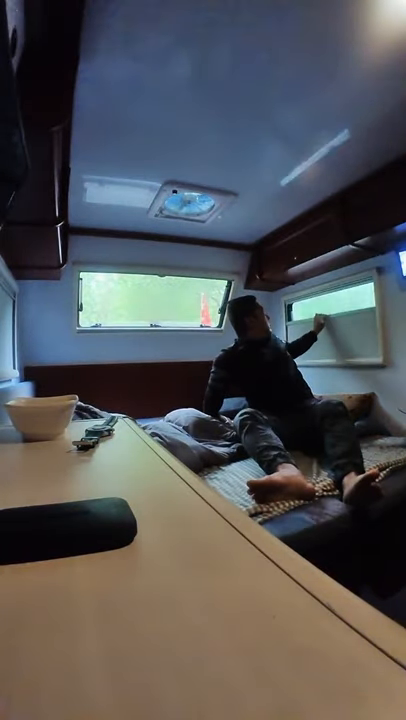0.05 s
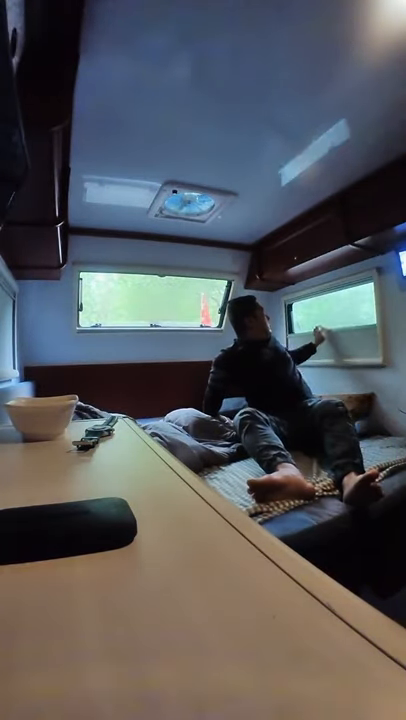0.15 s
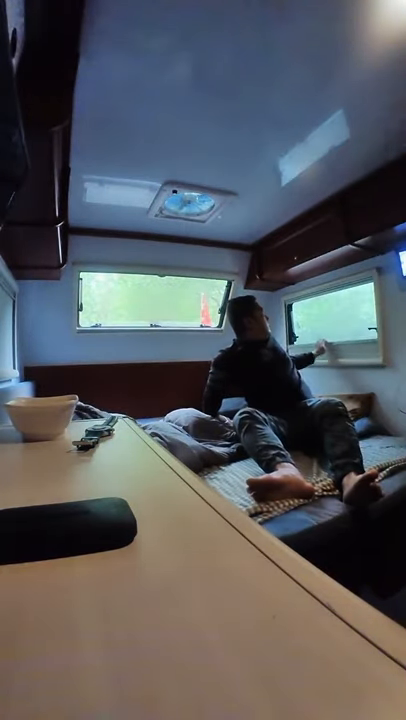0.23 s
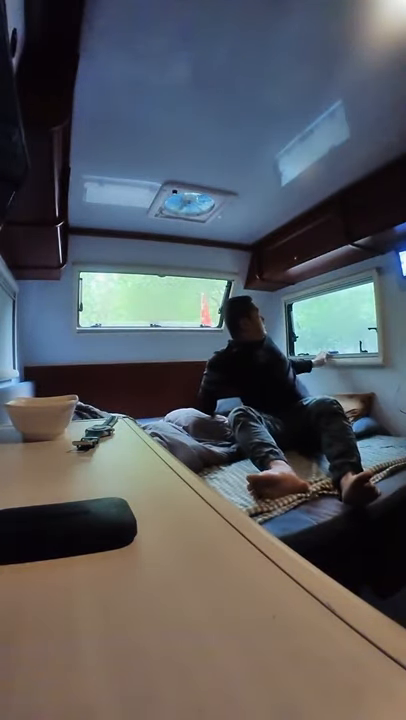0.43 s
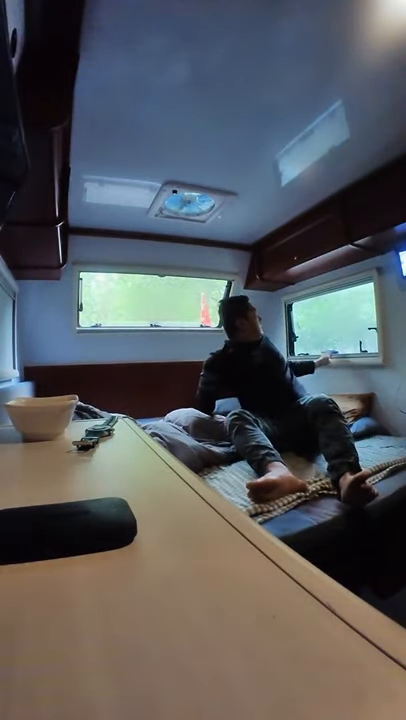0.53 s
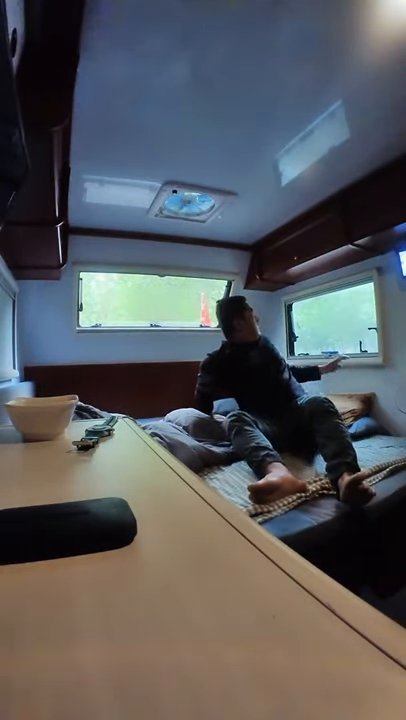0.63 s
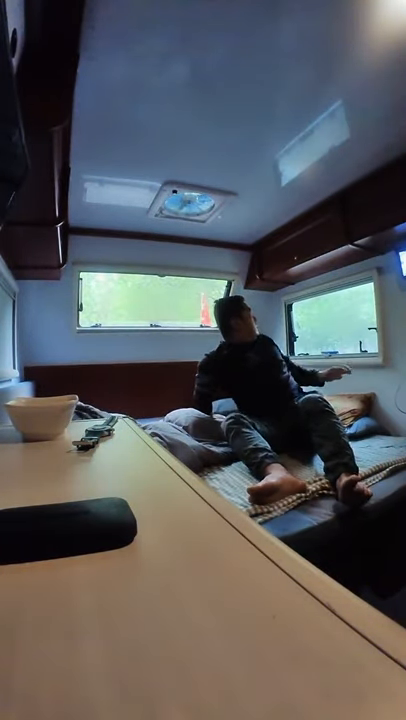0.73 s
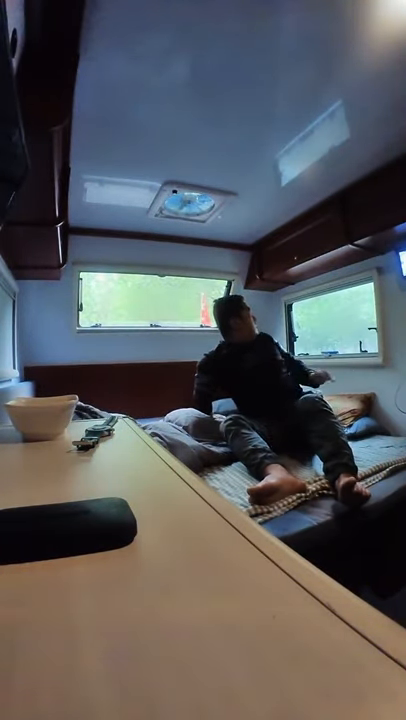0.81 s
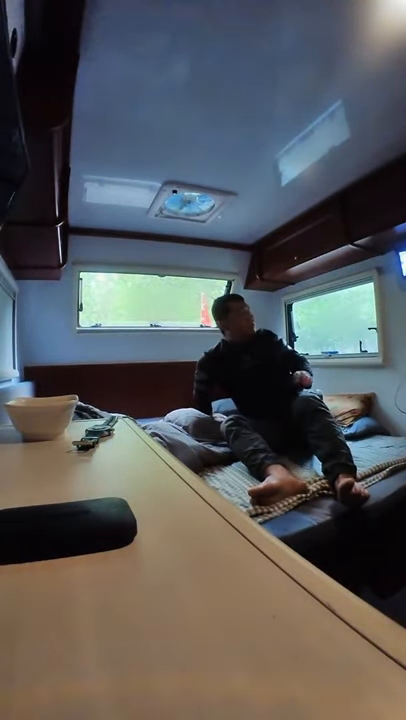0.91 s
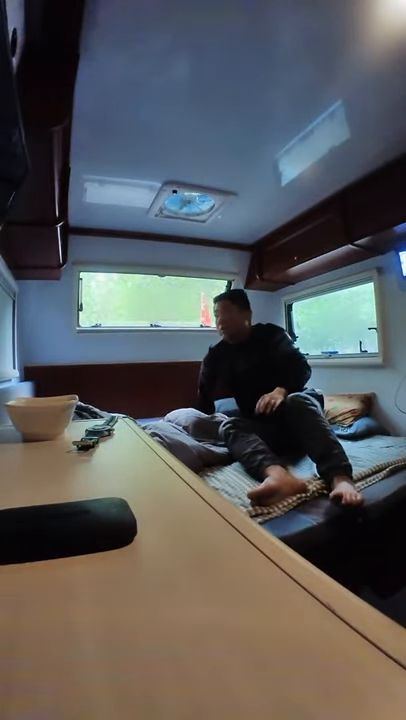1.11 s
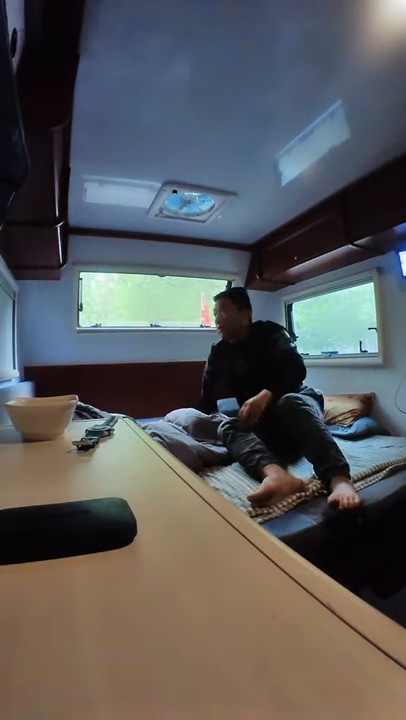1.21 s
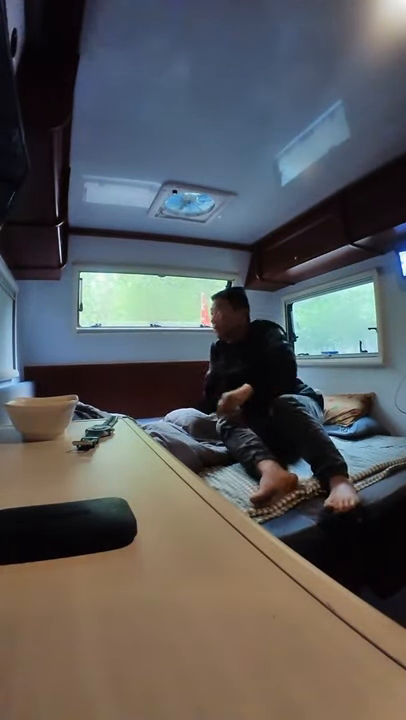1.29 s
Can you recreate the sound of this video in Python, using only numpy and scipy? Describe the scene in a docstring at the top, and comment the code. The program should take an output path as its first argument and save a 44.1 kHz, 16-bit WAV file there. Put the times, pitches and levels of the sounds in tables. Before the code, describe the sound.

A pleated camper blind slides open with a ticking swish, ending in one sharp clack.

```python
"""Pulling down a camper blind

A pleated blind rubs down its plastic rails in a small camper, swishing, ticking and bumping the wall.
It clacks against the end stop, the frame rings and the pleats shiver to rest. The frame gives a tiny
creak as the hand lets go. Then clothes rustle under a few very faint chirps."""
import sys
import numpy as np
from scipy import signal
from scipy.fft import rfft, irfft
from scipy.io import wavfile

SR = 44100
rng = np.random.default_rng(int(sys.argv[2]) if len(sys.argv) > 2 else 0)


def put_to_file(sound):
    """Save the sound as 16-bit audio at rate SR, in the file named by the first command-line argument."""
    columns = np.atleast_2d(sound).T  # one column per channel
    safe = np.clip(columns, -1, 1)
    whole_steps = np.round(safe * 32767)
    wavfile.write(sys.argv[1], SR, whole_steps.astype(np.int16))


N = 59535
T = np.arange(N) / SR

# The tone colours of the noises. Each row: frequency in Hz, relative strength in dB.
AIR_COLOUR = [(15, -38.5), (25, -25.5), (59, -2.5), (156, -2.5), (193, -7), (289, -9), (523, -13.5),
              (666, -14.5), (1710, -23.5), (7700, -31.5), (15500, -52)]   # still air in the camper
CLOTHES_COLOUR = [(200, 3.5), (800, -5), (1500, -1), (2400, -5.5), (4000, -5.5), (7000, -17),
                  (14000, -31.5)]   # rustling cloth
SCUFF_COLOUR = [(200, -2), (450, -2), (700, -4), (1020, -4), (1400, -9), (4000, -23.5), (12000, -54)]   # the dull body of the frame
WALL_COLOUR = [(25, -19), (55, -19), (110, 0), (195, -6), (255, -3.5), (350, -9), (520, -20), (1200, -53)]   # the rumbling wall panel
HISS_COLOUR = [(200, -14), (500, -6), (900, -7), (1300, 1), (2200, -1), (3500, -2), (6300, -4), (7600, -15),
               (9300, -21.5), (10300, -28), (13000, -33.5), (15500, -54)]   # the rubbed rails
SHIVER_COLOUR = [(100, 11.5), (400, 0.5), (800, 0.5), (1800, -0.5), (3600, -3.5), (6500, -15.5),
                 (9500, -24.5), (16000, -40.5)]   # the shaking pleats
CRACK_COLOUR = [(60, -17), (150, -6.5), (250, -2.5), (450, -6), (900, -10.5), (1600, 0.5), (3000, -5.5),
                (4500, -11.5), (6500, -17.5), (7400, -24.5), (8200, -17.5), (12000, -33.5), (16000, -44.5)]   # the bar striking the stop

# How the noises grow and fade. Each row: time in seconds, level in dB.
CLOTHES_LEVELS = [(.6, -69.5), (.85, -67), (.98, -62), (1.14, -62.5), (1.35, -62)]
RUMBLE_LEVELS = [(0, -33.5), (.025, -46.5), (.052, -52), (.125, -40.5), (.145, -35), (.18, -39),
                 (.24, -34.5), (.32, -37), (.39, -39), (.43, -29)]
RUB_LEVELS = [(0, -38.5), (.05, -38.5), (.1, -36), (.18, -38), (.245, -32), (.305, -35), (.34, -30.5),
              (.37, -35.5), (.43, -31)]

# Short tones. Each row: start in seconds, length in seconds, pitch in Hz, level in dB.
FAINT_CHIRPS = [(1.105, .024, 4400, -63), (1.123, 0.055, 1393, -58), (1.132, 0.024, 3570, -67),
                (1.16, 0.076, 1410, -62.5), (1.225, 0.055, 1450, -65.5), (1.25, 0.033, 3710, -71.5),
                (1.302, .04, 1350, -58)]
SLIDER_GROANS = [(.11, 0.045, 783, -43), (.243, .05, 652, -41), (.3, 0.18, 674.4, -40)]

# Things that hit. Each row: start in seconds, relative strength in dB.
WALL_BUMPS = [(.138, -33.5), (.289, -24), (.327, -25.5), (.4385, -12.5), (.475, -23), (.495, -24),
              (.505, -29), (.535, -34), (.543, -49), (.574, -37.5), (.587, -40)]   # the blind meets the wall
SLIDER_CATCHES = [(0.1927, -28.5), (0.2369, -16.5), (0.265, -30), (0.3184, -28), (0.335, -22.5)]   # the slider snags in the rail
STOP_HITS = [(.4342, 3), (.4432, -9.5)]   # the bar hits the stop and bounces once

# Bands where a part rings. Each row: pitch in Hz, width in Hz, relative level in dB.
GRIP_BANDS = [(353, 63, -7.5), (480.5, 200, -8)]
RAIL_BANDS = [(658, 45, -1), (1062, 48, 1), (1274, 66, -3), (1556, 76, -3.5), (1940, 33, -1),
              (2500, 80, -4.5), (2890, 90, 1.5)]
# The wall panel's notes. Each row: pitch in Hz, relative level in dB, seconds to fade by 60 dB.
WALL_NOTES = [(76, -6, .08), (117.6, -2, 0.11), (168, 0.5, 0.056), (239, -7, .06), (259, -8.5, 0.055),
              (333, -14, .05)]
# The notes of the bar and frame. Each row: pitch in Hz, relative level in dB.
FRAME_NOTES = [(515, -9), (648, -8.5), (742, 1), (1046, -2.5), (1155, -3.5), (1378, 0), (1507, -5.5),
               (1690, 1.5), (1795, -0.5), (1900, -6.5), (2198, -14.5), (2495, 0.5), (2855, 2), (3475, -5.5),
               (4186, -4), (6459, -12.5)]

STOP_S = 0.4289   # the slide ends and the shiver begins


def from_db(db):
    """Turn decibels into a number to multiply by."""
    return 10 ** (np.asarray(db) / 20)


def rms_one(x):
    """Scale a sound so its average strength (rms) is 1."""
    return x / np.sqrt(np.mean(x ** 2) + 1e-20)


def level(rows):
    """A loudness curve drawn through rows of time and level."""
    return from_db(np.interp(T, *np.transpose(rows)))


def coloured(colour, source=None):
    """Give white noise, or another source, a tone colour."""
    hz, db = np.transpose(colour)
    source = rng.standard_normal(N) if source is None else source
    bins = np.maximum(np.arange(N // 2 + 1) * SR / N, 1)
    gain = from_db(np.interp(np.log(bins), np.log(hz), db))
    bass_fade = np.minimum(bins / hz[0], 1) ** 2
    return rms_one(irfft(rfft(source) * gain * bass_fade, N))


def low_pass(x, hz):
    """Soften everything above hz."""
    return signal.sosfilt(signal.butter(2, hz, fs=SR, output="sos"), x + 1e-18)


def ring(x, hz, t60):
    """Each click in x starts a note that fades by 60 dB in t60 seconds."""
    decay, turn = from_db(-60 / (t60 * SR)), 2 * np.pi * hz / SR
    return signal.lfilter([0, np.sin(turn)], [1, -2 * decay * np.cos(turn), decay ** 2], x + 1e-18)


def noise_band(hz, width_hz):
    """Noise that sings around one pitch."""
    decay = np.exp(-np.pi * width_hz / SR)
    feedback = [1, -2 * decay * np.cos(2 * np.pi * hz / SR), decay ** 2]
    return rms_one(signal.lfilter([1, 0, -1], feedback, rng.standard_normal(N)))


def clicks(rows):
    """One click for each row of start and strength."""
    starts, db = np.transpose(rows)
    return np.bincount((starts * SR).astype(int), from_db(db), N)


def burst(start, hold, t60):
    """A loudness curve that jumps up, holds, then fades by 60 dB in t60 seconds."""
    rise = np.clip((T - start) / .002 + .5, 0, 1)
    return rise * from_db(-60 * np.maximum(T - start - hold, 0) / t60)


def swell(start, length):
    """A loudness curve shaped like a rounded arch."""
    return np.sqrt(np.abs(np.sin(np.pi * np.clip((T - start) / length, 0, 1))))


def flutter(hz, db):
    """A loudness curve that wanders at random by about db decibels."""
    return from_db(db * rms_one(low_pass(rng.standard_normal(N), hz)))


def wavering(hz, waver_hz):
    """An unsteady tone; a higher waver_hz makes it rougher."""
    phase = 2 * np.pi * np.cumsum(hz * np.ones(N)) / SR
    a, b = low_pass(rng.standard_normal((2, N)), waver_hz)
    return rms_one(a * np.cos(phase) + b * np.sin(phase))


def tones(rows, waver_hz):
    """One short unsteady tone for each row."""
    return sum(from_db(db) * swell(start, length) * wavering(hz, waver_hz)
               for start, length, hz, db in rows)


def air():
    """The low, steady hush inside the camper."""
    return from_db(-60) * coloured(AIR_COLOUR)


def cabin_echo(x, dull_hz=2460):
    """The padded walls add short, dull echoes to a sound."""
    echoes = low_pass(rng.standard_normal(N), dull_hz) * burst(start=.005, hold=0, t60=.041)
    echoes /= np.sqrt(np.sum(echoes ** 2) * SR / (2 * dull_hz))
    return x + from_db(-12.5) * signal.fftconvolve(x, echoes)[:N]


def chirps():
    """A few thin, very faint chirps near the end."""
    return tones(FAINT_CHIRPS, waver_hz=65)


def clothes():
    """Cloth rustles softly, a little louder once the blind is down."""
    return level(CLOTHES_LEVELS) * coloured(CLOTHES_COLOUR)


def creak(start=.572, length=.029, pitch_hz=2038, fall_hz_per_s=4100):
    """The hand lets go and the frame gives a falling squeak over a dull scuff."""
    age = np.clip(T - start, 0, length)
    squeak = wavering(pitch_hz - fall_hz_per_s * age, waver_hz=130)
    body = from_db(-2) * coloured(SCUFF_COLOUR)
    return from_db(-54) * swell(start, length) * (squeak + body)


def settle():
    """The bar scuffs into its seat."""
    return from_db(-48) * swell(start=.45, length=.025) * coloured(SCUFF_COLOUR)


def grip():
    """The hand takes hold of the bar with a hollow scuff."""
    hollow = sum(from_db(db) * wavering(hz, width / 2) for hz, width, db in GRIP_BANDS)
    return from_db(-32) * swell(start=.00082, length=.05) * hollow


def groans():
    """The slider groans as it rubs along the rail."""
    return tones(SLIDER_GROANS, waver_hz=32)


def bumps(low_cut_hz=110):
    """Soft bumps from the blind set the wall panel ringing."""
    push = low_pass(clicks(WALL_BUMPS), hz=477)
    push = signal.sosfilt(signal.butter(2, low_cut_hz, "high", fs=SR, output="sos"), push)
    return sum(from_db(db) * ring(push, hz, t60) for hz, db, t60 in WALL_NOTES)


def ticks(t60=.026):
    """Each catch makes the slider ring and throws out a short hiss."""
    taps = low_pass(clicks(SLIDER_CATCHES), hz=5000)
    spray = sum(from_db(db - 11.5) * burst(start, 0, t60) for start, db in SLIDER_CATCHES)
    return ring(taps, hz=2920, t60=t60) + spray * coloured(HISS_COLOUR)


def rail_hiss(slips_per_s=1700, runs_freely_s=.066):
    """Tiny slips make a grainy hiss, a bit duller until the blind runs freely."""
    slips = (rng.random(N) < slips_per_s / SR) * rng.choice([-1, 1], N)
    slip_db = np.minimum(rng.exponential(1, N), 4)
    grains = rms_one(slips * from_db(slip_db))
    hiss = coloured(HISS_COLOUR, rng.standard_normal(N) + from_db(.5) * grains)
    dull_share = .22 * (T < runs_freely_s)
    return (1 - dull_share) * hiss + dull_share * low_pass(hiss, hz=3780)


def slide(rise_db_per_s=10.5):
    """Rubbing makes the rails hiss and sing and the wall rumble until the blind stops."""
    hiss = from_db(-2) * rail_hiss()
    singing = rms_one(sum(from_db(db) * noise_band(hz, width) for hz, width, db in RAIL_BANDS))
    singing *= from_db(-2 + rise_db_per_s * np.minimum(T - STOP_S, 0))   # grows as the blind speeds up
    rub = level(RUB_LEVELS) * flutter(hz=70, db=1.29) * (hiss + singing)
    rumble = level(RUMBLE_LEVELS) * coloured(WALL_COLOUR)
    return (rub + rumble) * burst(start=0, hold=STOP_S, t60=.02)


def end_stop():
    """The bar cracks against the stop; the frame rings and the pleats shiver until the hand stills them."""
    crack = sum(from_db(db - 13) * burst(start, hold=.0069, t60=.021) * coloured(CRACK_COLOUR)
                for start, db in STOP_HITS)
    hits = clicks(STOP_HITS)
    frame = np.zeros(N)
    for k, (hz, db) in enumerate(FRAME_NOTES):
        t60 = .091 * (hz / 1000) ** -.26   # higher notes die sooner
        direction = (-1) ** k   # every other note swings the opposite way
        frame += direction * from_db(db - 15.5) * ring(hits, hz, t60)
    shaking = burst(STOP_S, hold=.045, t60=.12) * flutter(hz=150, db=1.5)
    shiver = from_db(-25) * shaking * coloured(SHIVER_COLOUR)
    coming_to_rest = burst(start=0, hold=.533, t60=.043)
    return crack + (frame + shiver) * coming_to_rest


def scene():
    """The blind and its echoes, over clothes, chirps and still air, in one channel."""
    blind = grip() + slide() + groans() + ticks() + bumps() + end_stop() + settle() + creak()
    return (cabin_echo(blind) + clothes() + chirps() + air())[None]


def record(dry, low_cut_hz=45, high_cut_hz=15800):
    """Drop the deepest bass, round off the peaks and cut the highest treble."""
    trimmed = signal.sosfilt(signal.butter(3, low_cut_hz, "high", fs=SR, output="sos"), dry)
    rounded = np.tanh(trimmed)
    return signal.sosfilt(signal.ellip(10, .1, 80, high_cut_hz, fs=SR, output="sos"), rounded)


dry = scene()
out = record(dry)
put_to_file(out)
```